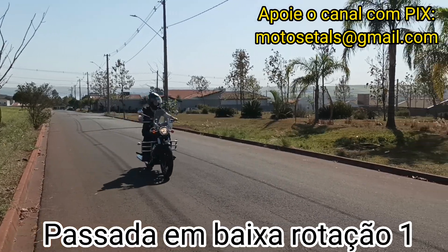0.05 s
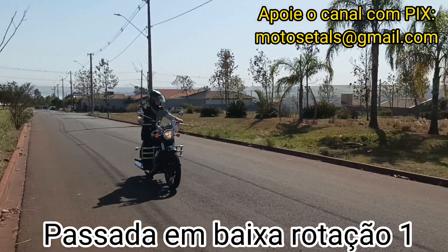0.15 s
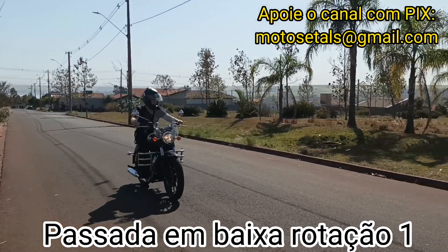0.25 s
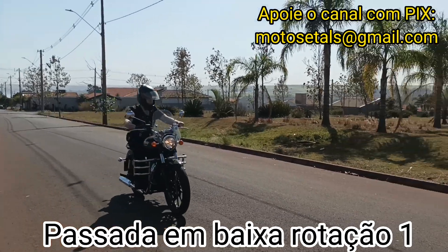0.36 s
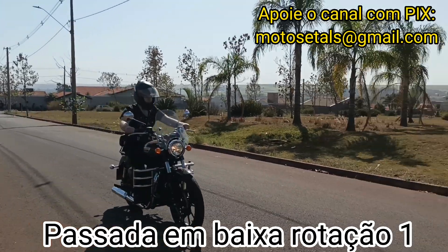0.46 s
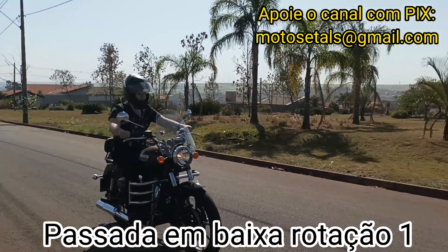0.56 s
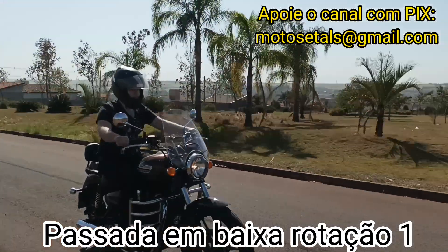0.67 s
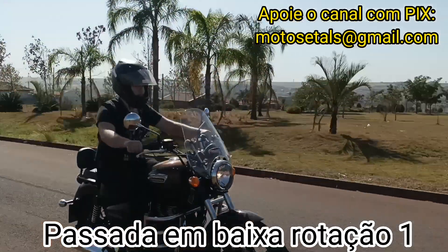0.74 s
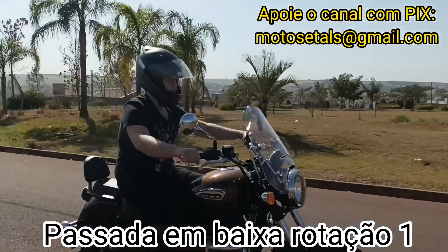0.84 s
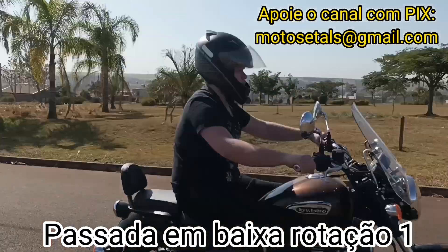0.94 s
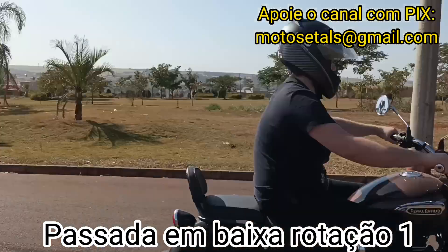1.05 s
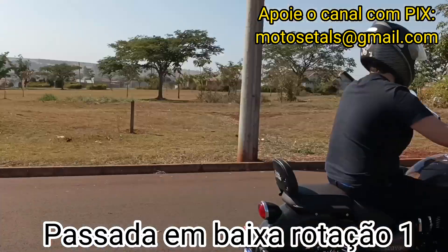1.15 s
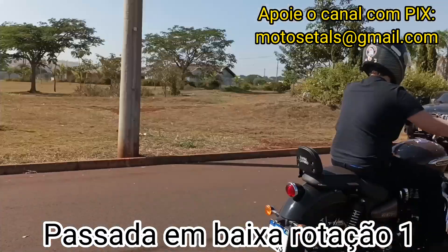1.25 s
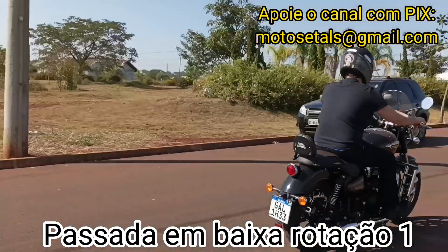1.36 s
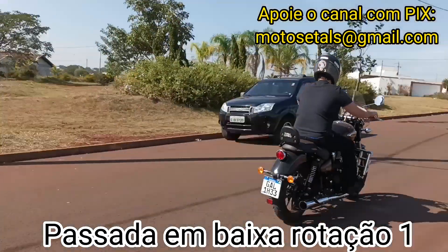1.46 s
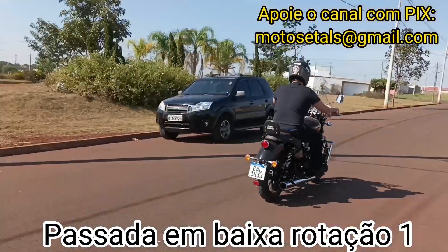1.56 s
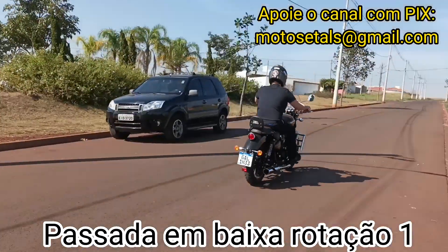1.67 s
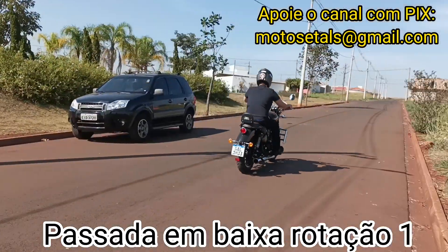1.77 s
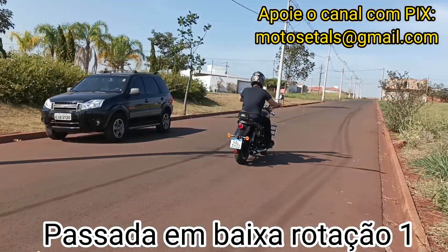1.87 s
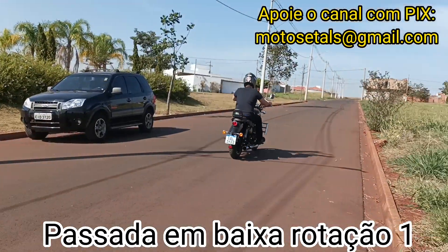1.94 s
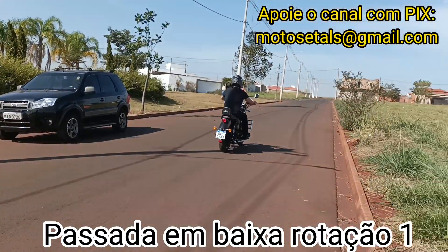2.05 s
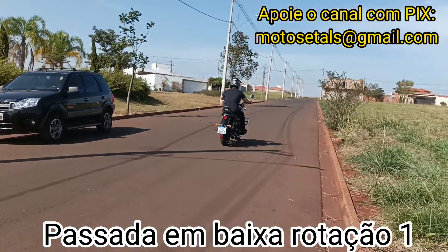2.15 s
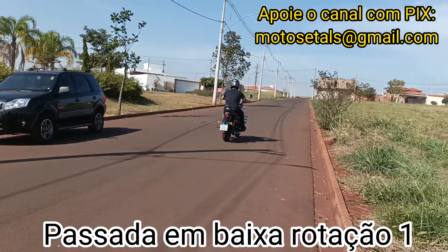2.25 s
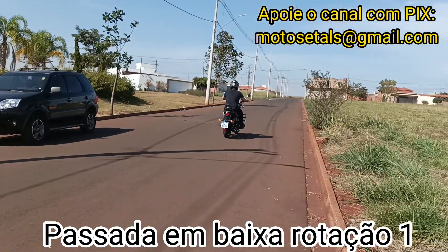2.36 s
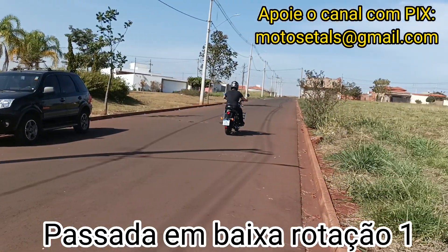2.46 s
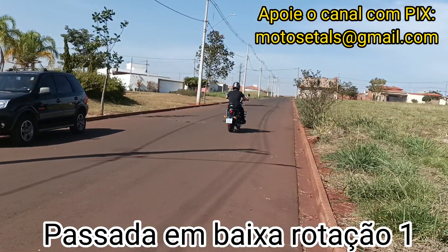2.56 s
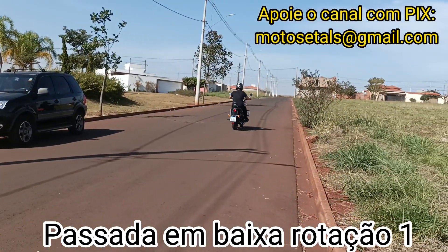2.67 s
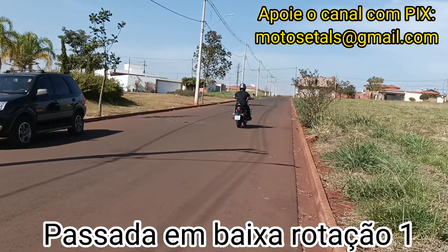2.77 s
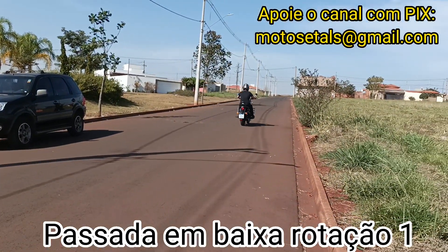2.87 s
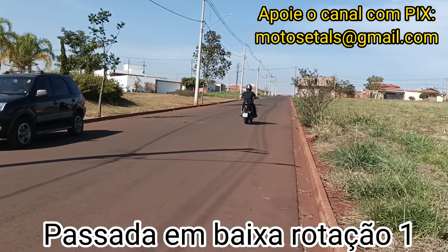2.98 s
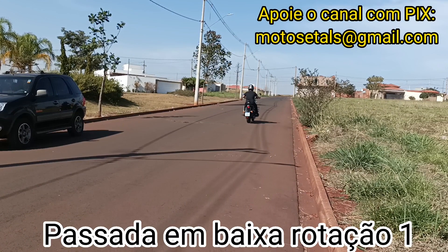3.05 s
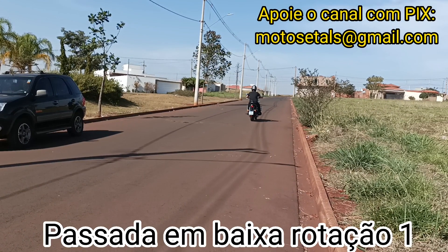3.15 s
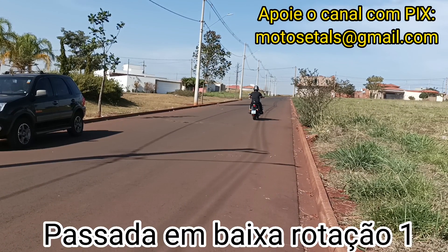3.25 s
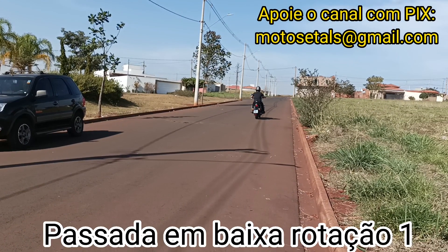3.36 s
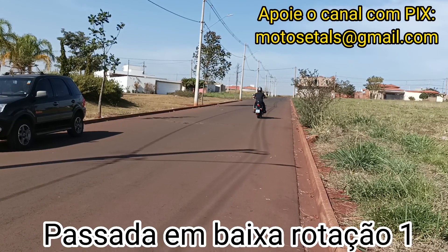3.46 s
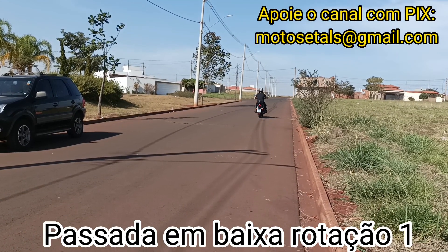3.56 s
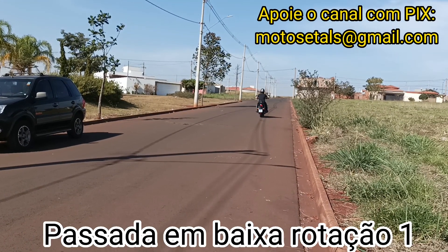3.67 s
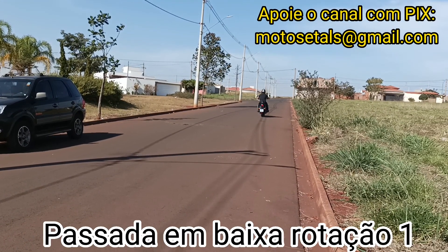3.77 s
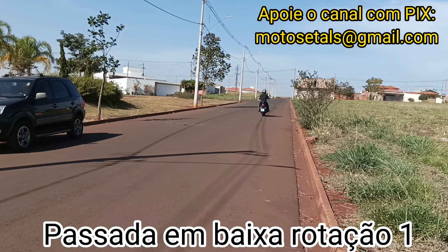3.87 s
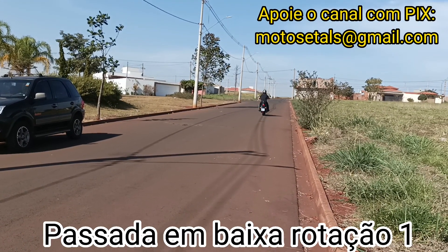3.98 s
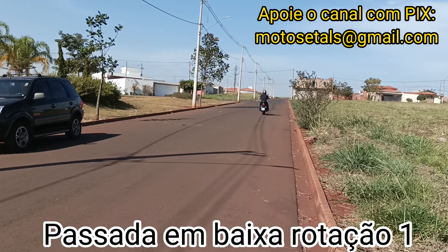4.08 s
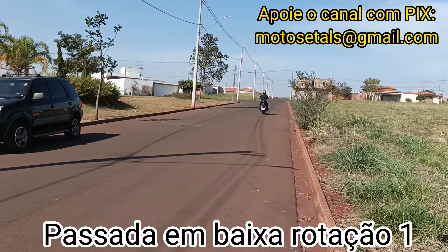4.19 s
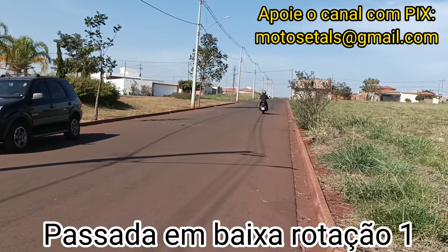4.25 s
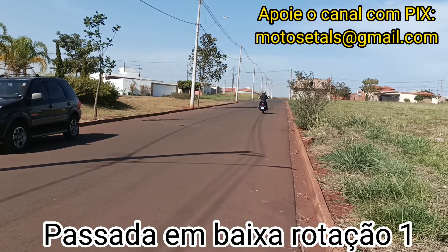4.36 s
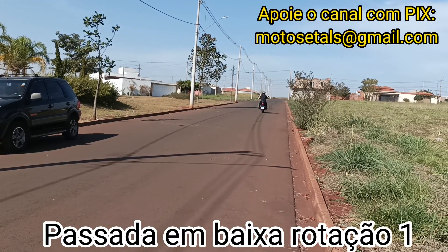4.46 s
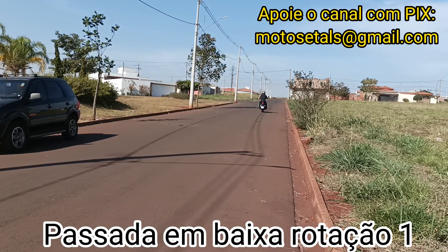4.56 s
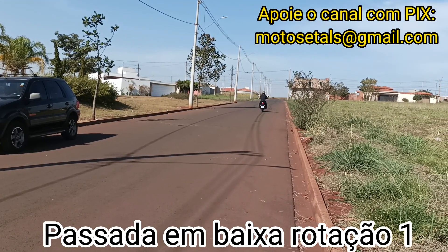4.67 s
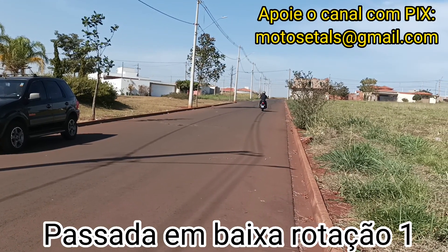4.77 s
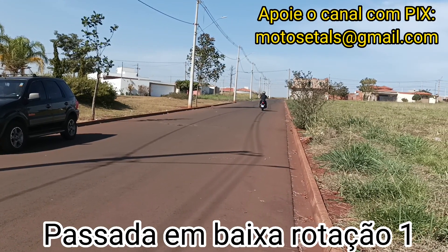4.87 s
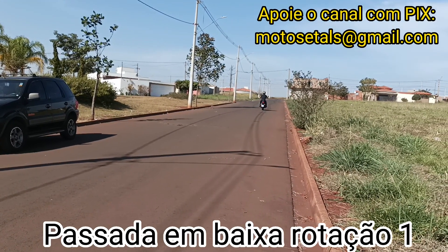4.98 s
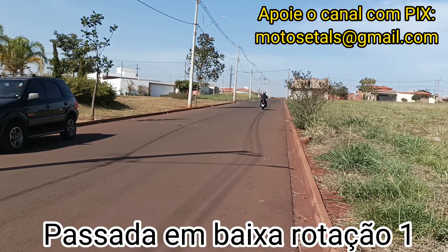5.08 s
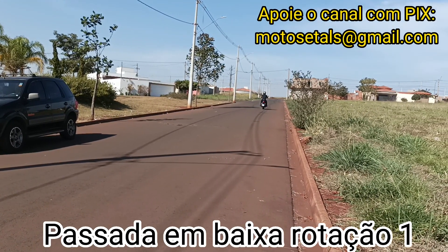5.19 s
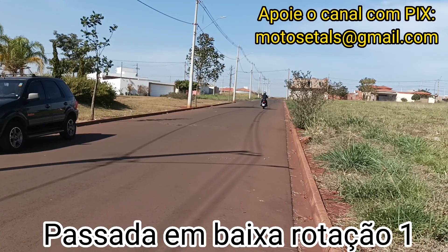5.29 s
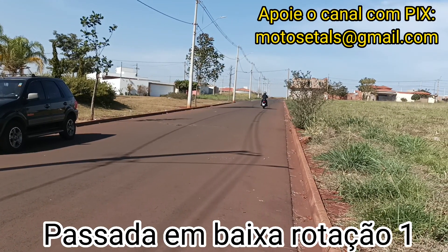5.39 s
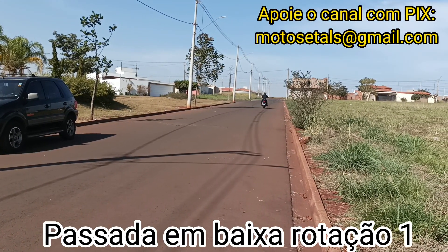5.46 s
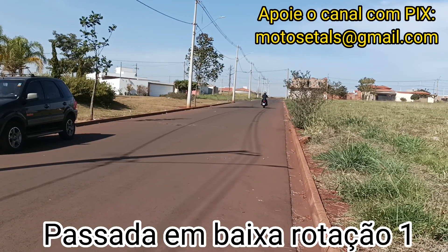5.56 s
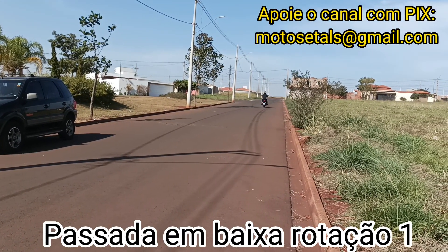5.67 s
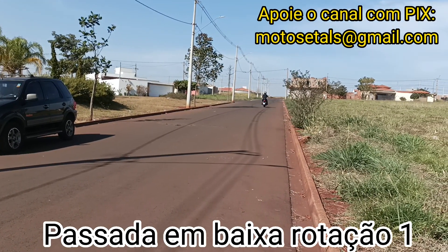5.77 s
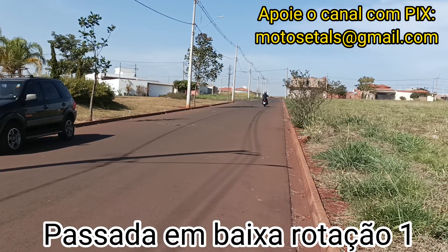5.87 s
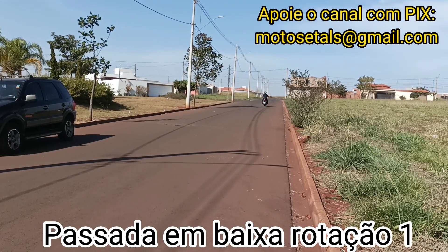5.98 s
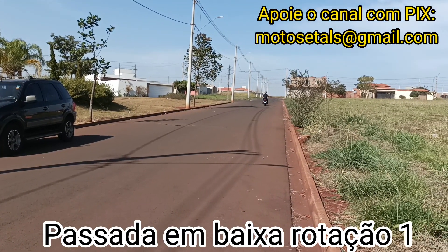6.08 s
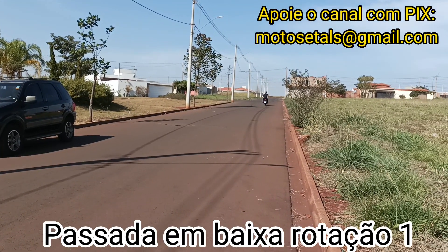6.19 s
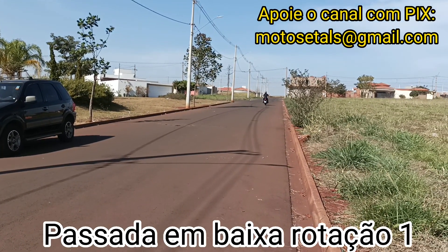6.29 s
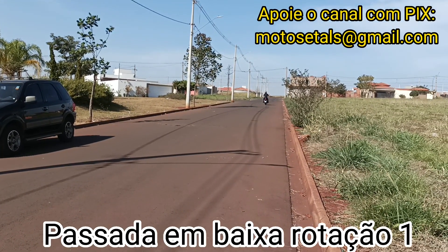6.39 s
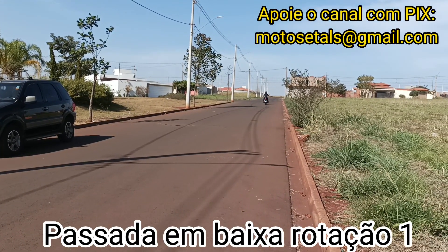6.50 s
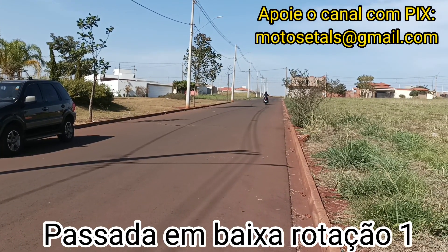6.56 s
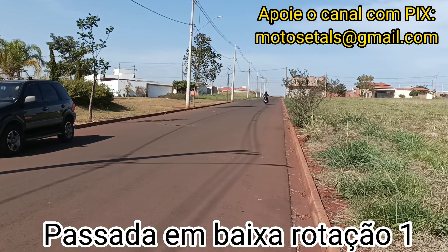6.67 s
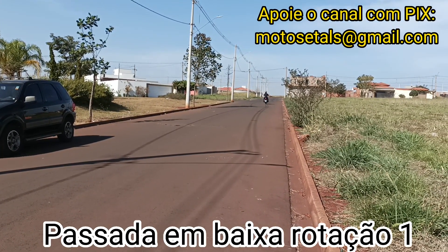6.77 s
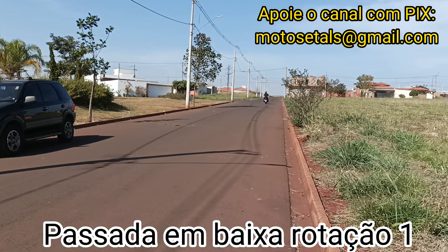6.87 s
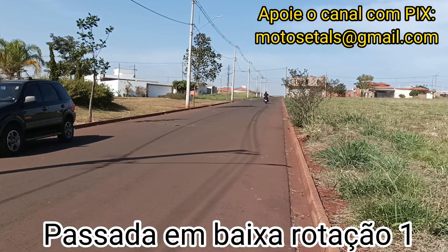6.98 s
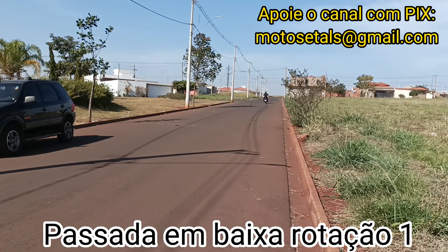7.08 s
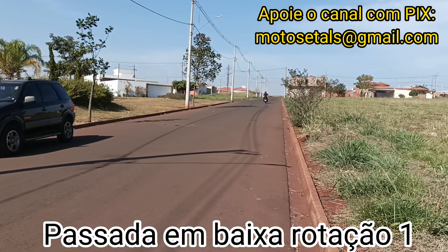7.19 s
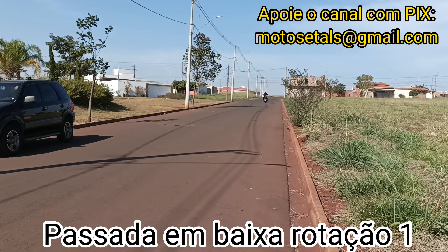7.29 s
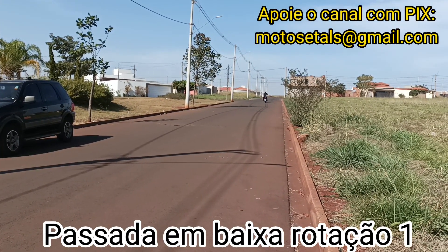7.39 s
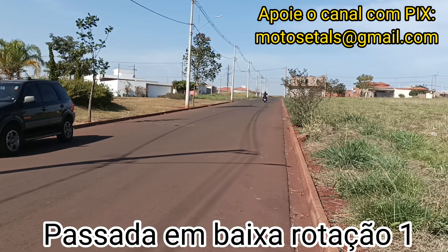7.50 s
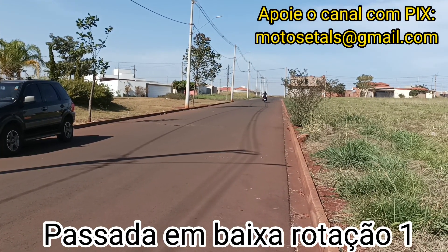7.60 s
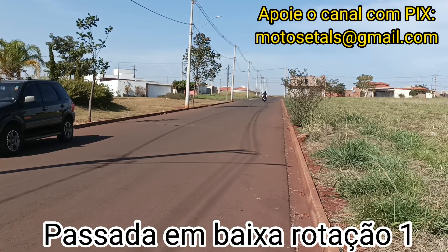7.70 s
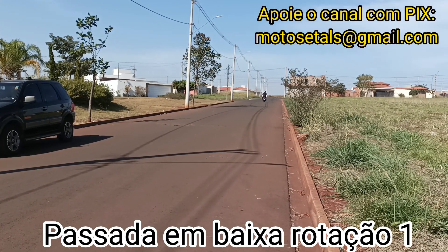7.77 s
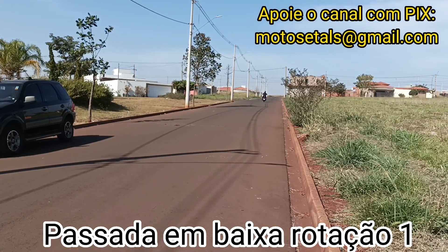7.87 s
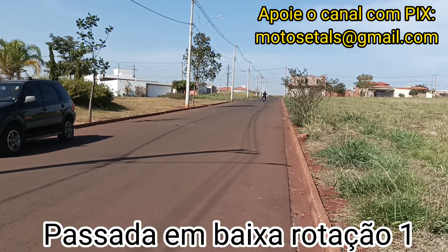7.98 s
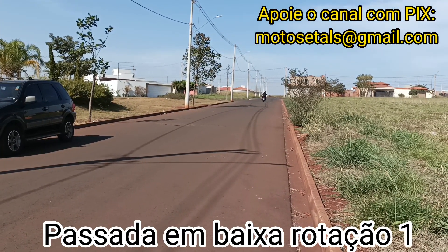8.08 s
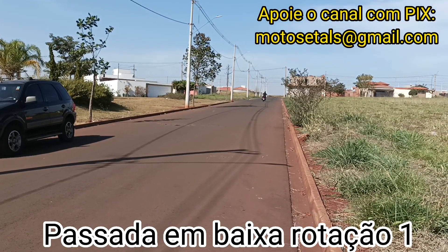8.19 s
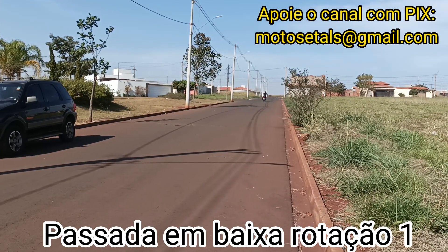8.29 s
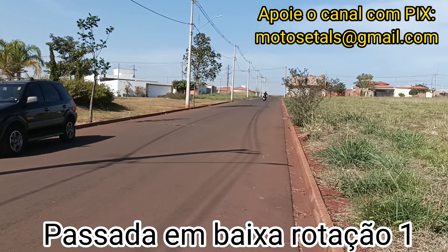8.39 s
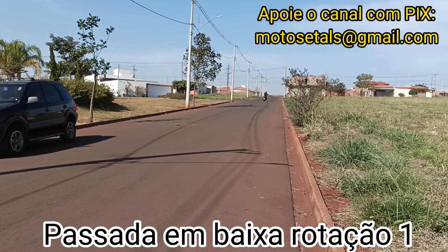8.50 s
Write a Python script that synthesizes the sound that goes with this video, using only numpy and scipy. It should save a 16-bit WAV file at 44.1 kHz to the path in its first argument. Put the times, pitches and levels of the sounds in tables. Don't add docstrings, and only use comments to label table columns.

```python
import sys
import numpy as np
from scipy import signal
from scipy.io import wavfile
from scipy.ndimage import uniform_filter1d

SR = 44100
rng = np.random.default_rng(int(sys.argv[2]) if len(sys.argv) > 2 else 0)


def voltage_ratio(level):
    return 10 ** (np.asarray(level, float) / 20)


def int16_out(signal):
    q = np.round(np.clip(np.atleast_2d(signal).T, -1, 1) * 32767)
    wavfile.write(sys.argv[1], SR, q.astype(np.int16))


N = 376613
T = np.arange(N) / SR
BANDS = 560 * 2 ** np.arange(0, 4.9, 1 / 3)
PASSES_S, FIRST_COAST_S = 1.027, 6.3148


def at_rms(x, db):
    return x * voltage_ratio(db) / np.sqrt(np.mean(x ** 2))


def cut(x, hz, kind, order=2):
    return signal.sosfilt(signal.butter(order, hz, kind, fs=SR, output="sos"), x)


def ring(x, hz, width, count=1):
    for _ in range(count):
        x = signal.lfilter(*signal.iirpeak(hz, hz / width, SR), x)
    return x


def late(x, ms):
    return np.interp(T - ms / 1000, T, x, left=0)


def at(table, hz):
    table_hz, value = np.transpose(table)
    return np.interp(np.log(hz), np.log(table_hz), value)


def blend(hz, colour, anchors, curves):
    db = at(colour, hz)
    for anchor, curve, row in zip(anchors, curves, np.eye(len(anchors))):
        share = np.interp(np.log(hz), np.log(anchors), row)
        db = db + share * (curve - at(colour, anchor))
    return db


def walk(rate):
    hold = int(SR / rate)
    steps = np.repeat(rng.standard_normal(N // hold + 1), hold)
    return 1.25 * uniform_filter1d(uniform_filter1d(steps, hold), hold)[:N]


def train(times, gains, shape):
    x = np.zeros(N)
    i = np.round(times * SR).astype(int)
    x[i[i < N]] = gains[i < N]
    return signal.oaconvolve(x, shape)[:N]


def slug(ms):
    return np.exp(-.5 * ((T[:400] * 1000 - 4) / ms) ** 2)


# hz, likeness (0-1)
LIKENESS = [(60, 0.97), (130, 0.98), (290, 0.1), (640, 1), (1410, 0.6), (3100, 0.5), (6820, 0.2),
            (15000, -0.01)]
# hz, left_minus_right_db
LEFT_LEAN = [(60, 0.5), (110, 0.5), (200, 0.5), (380, 28.5), (700, 2), (1290, 1), (2380, -0.5), (4400, -1),
             (8120, -14), (15000, 64)]


def wide(hz, gate, click=0):
    alike = np.clip(at(LIKENESS, hz) + 0.072, 0, 1)
    noise = gate * rng.standard_normal((2, N))
    noise[0] += click
    mid, side = cut(noise, [hz / 1.12, hz * 1.12], "band")
    pair = np.sqrt(1 + alike) * mid + np.sqrt(1 - alike) * side * np.array([[1], [-1]])
    return pair * voltage_ratio(np.clip(at(LEFT_LEAN, hz), -6, 9) * np.array([[.5], [-.5]]))


def air():
    far = rng.standard_normal(N) + 0.29 * rng.standard_normal((2, N))
    rumble = at_rms(cut(far, [70, 430], "band"), -45)
    gusts = rng.standard_normal(N) + 2.6 * rng.standard_normal((2, N))
    wind = cut(gusts, [25, 65], "band") * voltage_ratio(5.2 * walk(3))
    return rumble + at_rms(wind, -60)


# start_s, length_s, start_hz, end_hz, level_db
BIRD_CHIPS = [
    (2.836, 0.027, 8400, 8100, -55),
    (4.85, 0.018, 8100, 7740, -61),
    (6.062, 0.022, 8300, 7700, -48),
    (6.7, 0.016, 8800, 8200, -64),
    (7.431, 0.013, 8260, 7160, -55),
    (7.62, .11, 6850, 6700, -73),
    (7.673, 0.084, 7060, 3900, -65),
]


def birds():
    out = np.zeros(N)
    for s, length, hz, end_hz, db in BIRD_CHIPS:
        u = np.clip((T - s) / length, 0, 1)
        cycles = length * (hz * u + (end_hz - hz) * u ** 2 / 2)
        out += voltage_ratio(db) * np.sin(np.pi * u) * np.sin(2 * np.pi * cycles)
    return out * np.array([[.8], [1.2]])


def closeness(t):
    near_s = 0.52
    return 1 / (1 + ((t - PASSES_S) / near_s) ** 2)


def effort(t):
    return np.exp(-((t - 5.06) / 1.38) ** 2)


# far_db, swell_db at the pass, fade_db_per_s after it, effort_db, throttle_shut_db
ROLL_LEVELS = [
    (-46.5, 4.5, -0.39, 2.5, -2.5),
    (-53, 11.5, 0.05, 3, -1.5),
    (-56.5, 9.5, -0.93, 2, -0.5),
    (-60, 11.5, -1.11, 1, -7),
]


def rolling(t):
    shut = np.interp(t, [FIRST_COAST_S - .1, FIRST_COAST_S + 0.36], [0, 1])
    away_s = np.maximum(t - PASSES_S, 0)
    return [db + swell * closeness(t) + fade * away_s + work * effort(t) + off * shut
            for db, swell, fade, work, off in ROLL_LEVELS]


# hz, level_db per Hz
HISS_COLOUR = [(500, -6), (829, -2), (1110, -4), (1240, -16), (1750, -15.5), (2150, -25), (3040, -21.5),
               (5750, -35.5), (7670, -24.5), (11700, -48.5), (14100, -71), (15800, -70)]
# start_s, pitch_hz, level_db
GEAR_WHINE = [(0, 1715, -48), (.33, 1670, -58), (.7, 1560, -72), (2.3, 1433, -64), (4, 1550, -62),
              (5.8, 1618, -63), (6.28, 1460, -58), (6.36, 1682, -60), (7.4, 1474, -59), (8, 1330, -83)]


def roll():
    when = T[::2048]
    low, middle, upper, top = rolling(when)
    out = 0
    for hz in BANDS:
        db = blend(hz, HISS_COLOUR, [850, 1700, 3500, 7500], [low + 12, middle + 9, upper + 7, top + 6])
        out = out + wide(hz, voltage_ratio(np.interp(T, when, db) + 1.12 * walk(12)))
    s, hz, db = np.transpose(GEAR_WHINE)
    pitch_hz = np.interp(T, s, hz) + 4 * walk(16)
    gear = voltage_ratio(np.interp(T, s, db, left=-99, right=-99)) * np.sin(2 * np.pi * np.cumsum(pitch_hz) / SR)
    knock = rng.standard_normal(N) * voltage_ratio(np.interp(T, when, low))
    case = voltage_ratio(12 + 13.7 * effort(T)) * ring(knock, 613, 40) + voltage_ratio(18.5) * ring(knock, 732, 60)
    case += voltage_ratio(-1 + 20 * closeness(T + 0.074)) * ring(knock, 1500, 270)
    fins = voltage_ratio(np.interp(T, when, top) + 8) * ring(rng.standard_normal((2, N)), 6970, 1000, count=2)
    return out + gear + case + fins


# start_s, left_ms, right_ms, share
NEAR_ECHOES = [
    [(0, 0.54, 0.45, 0.46), (1, 0.58, 0.43, 0.18), (1.35, 0.87, .95, 0.13), (1.7, 1.28, 1.66, 0.21),
     (3, 1.54, 1.37, 0.18), (8.54, 1.34, 1.32, 0.39)],
    [(0, 1.35, 2.08, 0.36), (1.7, 1.66, 1.59, 0.31), (3, 1.77, 1.74, 0.19), (8.54, 1.75, 1.72, 0.36)],
    [(0, 0.14, 0.14, 0.1), (1.2, 0.21, 0.17, 0.1), (1.7, 0.22, 0.28, 0.29), (3, 0.23, 0.383, 0.12),
     (8.54, 0.22, 0.31, 0.39)],
]


def near(x):
    out, bright = x.copy(), cut(x, 1250, "high")
    for table in NEAR_ECHOES:
        s, left, right, share = np.transpose(table)
        for k, ms in enumerate((left, right)):
            out[k] += np.interp(T, s, share) * late(bright[k], np.interp(T, s, ms))
    return out


# pitch_hz, width_hz, depth (0-1)
BODY_DIPS = [
    (948, 54, 0.55),
    (1217, 97, 0.56),
]


def road(x):
    close = np.interp(T, (.4, .7, 2.3, 3.1), [0, 1, 1, 0])
    far_notch = (.88 - 0.68 * close) * ring(x, 506, 108)
    x = x - far_notch - 0.42 * close * ring(x, 623, 90)
    for hz, width, depth in BODY_DIPS:
        x = x - depth * ring(x, hz, width)
    before, after, right = np.array((0, 7, 5)) * 1000 / SR
    return np.array([late(x[0], np.interp(T, (.85, 1.1), [before, after])), late(x[1], right)])


# hz, level_db per Hz
CRACK_COLOUR = [(500, -5), (1040, 5.5), (1330, -10), (1840, -10), (2250, -22), (2910, -17.5), (4450, -29.5),
                (5750, -45), (7450, -39.5), (11800, -43), (15800, -55)]
# start_s, peak_db, treble_db over the peak
HARD_FIRINGS = [(0.388, -16, -48), (0.434, -20, -27), (1.089, -16, -22), (1.184, -11, -33),
                (1.328, -15.5, -18), (1.618, -19.5, -16.5), (2.198, -15, -25), (2.391, -17, -29),
                (2.439, -18, -17.5), (2.487, -17.5, -29), (2.679, -13.5, -26.5), (2.966, -15.5, -31),
                (3.156, -18, -25), (3.441, -19, -24), (3.629, -13, -31), (3.677, -18, -30),
                (3.723, -16.5, -29), (3.771, -15, -40), (3.865, -14.5, -32), (3.912, -16.5, -32),
                (3.959, -15, -25), (4.1, -12.5, -27), (4.287, -14, -32), (4.334, -16.5, -27),
                (4.427, -12.5, -29), (6.964, -18.5, -31), (7.389, -19.5, -30), (7.896, -19, -23)]
# start_s, level_db
DEEP_THUDS = [
    (2.440, -12),
    (2.680, -11.5),
    (3.960, -12.5),
    (4.660, -32),
    (4.940, -17),
]


def cracks(times, low_db, mid_db, high_db, off):
    chance = rng.standard_normal((len(times), len(BANDS) + 2))
    low = low_db + 0.81 * chance[:, 0]
    mid = mid_db + 2.1 * chance[:, 1]
    high = high_db + 4.0 * chance[:, 1]
    for s, db, treble_db in HARD_FIRINGS:
        k = np.argmin(abs(times - s))
        low[k], mid[k], high[k] = db - 12.0, db + treble_db - 7.5, db + treble_db - 16.5
    tail = voltage_ratio(-49) * np.exp(-T[1:1500] / .007)
    shape = np.convolve(slug(1.61), np.r_[1, tail])
    sign = np.where(times < off[0] - .02, -1, .6)
    beam_db = 6 * np.exp(-((times - 1.89) / 0.26) ** 2)
    out = 0
    for k, hz in enumerate(BANDS):
        db = blend(hz, CRACK_COLOUR, [1000, 3200, 7500], [low + 14, mid + 14, high + 8])
        db += 0.96 * chance[:, k + 2] + beam_db * (hz > 4000)
        air_loss_db = 4 * np.clip(times - 5.0, 0, 9) * (hz / 10000) ** 2
        gain = voltage_ratio(db - air_loss_db)
        start = times - 1.636 / hz
        click = train(start + 0.000994, sign * gain, np.ones(1)) * (2.2 + 11 * (hz < 2000))
        out = out + wide(hz, train(start - .0028, gain, shape), click)
    snap = -train(times - .003, (sign < 0) * voltage_ratio(1.22 * low + 22), slug(0.22))
    s, db = np.transpose(DEEP_THUDS)
    snap = cut(snap, 63, "high") - train(s - .004, voltage_ratio(db), slug(0.43))
    tick_db = -35 + 3 * chance[:len(off), 0] - 6.0 * (off - 9.0)
    tick = ring(train(off - .024, voltage_ratio(tick_db), slug(.2)), 820, 120)
    return out + tick, cut(snap, 28, "high")


def pipe(x, echo, ms, dull):
    out = back = x
    for _ in range(3):
        back = signal.lfilter([1 - dull], [1, -dull], echo * late(back, ms))
        out = out + back
    return out


# start_s, echo_share, upper_mode_share, lower_mode_share
PIPE_VIEW = [
    (0, 0.17, 5.5, 1.1),
    (.7, 0.11, 12.6, 1.3),
    (1.2, 0.049, 0.65, 1.9),
    (1.7, 0.019, 0.56, 1.6),
    (3, 0.013, 2.1, 6.7),
    (5.8, 0.011, 5.6, 2.2),
    (6.2, 0.4, 2.2, 1.5),
]


def pulling_thump(on, s, db, boom_db):
    firing_db = np.interp(on, s, db) + .5 * rng.standard_normal(len(on))
    push = train(on - .0051, voltage_ratio(firing_db), slug(.82))
    when, *shares = np.transpose(PIPE_VIEW)
    bright, upper, lower = (np.interp(T, when, c) for c in shares)
    x = ring(push, 327.5, 912, count=3)
    x = pipe(x, 0.7, 9.62, .99) + bright * late(x, 11.08)
    boom = 5 * voltage_ratio(np.interp(T, s, boom_db)) * ring(x, 84, 28)
    return 11 * x + boom + upper * ring(x, 443, 90) + lower * ring(x, 420, 58)


def coasting_thump(off, s, db, boom_db):
    firing_db = np.interp(off, s, db) + .6 * rng.standard_normal(len(off))
    push = train(off - .0116, voltage_ratio(firing_db), slug(.55))
    y = push - 1.23 * late(push, 5.57)
    valve = ring(late(push, 6.27), 388, 120, count=2)
    cooling = np.clip((8.3 - T) / 3.26, 0, 1)
    y = ring(y, 66, 66)
    y = coasting_modes(y, push, cooling, valve)
    y = pipe(y, -0.8, 9.7, 0.99) - 0.1 * late(y, 19.4)
    y = 20 * y + 5 * voltage_ratio(np.interp(T, s, boom_db)) * ring(y, 71, 37)
    return cut(y, 50, "high")


def coasting_modes(slow, push, cooling, valve):
    y = push - 1.23 * late(push, 5.57)
    upper = 0.21 * cooling * ring(late(y, 3.96), 246, 150)
    return slow + upper + 0.082 * ring(late(y, 3.55), 226, 71) + 0.41 * valve


def firings(rate, first, last):
    t = np.arange(first, last, 1e-4)
    turns = np.cumsum(np.interp(t, *np.transpose(rate))) * 1e-4
    return np.interp(np.arange(int(turns[-1]) + 1), turns - turns[0], t)


# start_s, firings_per_s
PULL_FIRINGS = [(0, 21.311), (.35, 21.434), (.85, 21.422), (1.5, 20.608), (1.9, 20.664), (4.75, 21.523),
                (5.65, 21.539), (6.05, 21.157), (6.25, 20.445)]
# start_s, firings_per_s
COAST_FIRINGS = [(6.3, 20.609), (7, 19.173), (8, 17.006), (8.6, 15.855)]
# start_s, thump_db, crack_db over the thump, crack_sharpness (about 0-1)
EXHAUST_LEVELS = [
    [(0, -20.5, -13.5, 0.15), (.5, -19, -17, 0.3), (.95, -15.5, -15, 0.54), (1.19, -13.5, -10.5, 0.8), (1.5, -17, -21.5, 0.78), (1.95, -18.5, -16.5, 0.81), (2.4, -20.3, -14.5, 0.42), (3.2, -22, -12, 0.52), (4, -24, -9.5, 0.6), (4.3, -24.5, -4.5, 0.99), (5, -25, -11.5, 1.1), (5.6, -26.5, -13, 0.78), (5.92, -32, -14, .5), (6.2, -43, -14, -.5)],
    [ (6.31, -34, 2, 0.36), (7.3, -36.5, 3.5, .4), (7.9, -40.3, 5, 0.99), (8.5, -42.5, 5.5, 0.99)],
]
# dull_db, gain_db when sharp
CRACK_EDGE = [
    [(-41.5, 19), (-46.5, 10)],
    [(-30, 24.5), (-39, 19)],
]


def motorcycle():
    on = firings(PULL_FIRINGS, .0152, 6.27)
    off = firings(COAST_FIRINGS, FIRST_COAST_S, N / SR)
    pull, coast = (np.transpose(c) for c in EXHAUST_LEVELS)
    boom_db = np.interp(pull[0], [PASSES_S - .2, PASSES_S + .3], [-3, -1])
    boom_db = boom_db + np.interp(pull[0], (5.44, 6.37), [0, 28])
    coast_boom_db = np.interp(coast[0], [7.2, 8.2], (1, 12))
    thump = pulling_thump(on, *pull[:2], boom_db) + coasting_thump(off, *coast[:2], coast_boom_db)
    body = cut(thump, 82, "high", order=4)
    levels = []
    for when, (s, db, crack, sharp), edge in zip((on, off), (pull, coast), CRACK_EDGE):
        overs = [crack] + [dull + gain * sharp for dull, gain in edge]
        levels.append([np.interp(when, s, db + over) for over in overs])
    crack, snap = cracks(np.r_[on - .0015, off - .0036], *np.hstack(levels), off)
    side = voltage_ratio(-30.5) * late(body, 0.76) * np.array([[1], [-1]])
    return body + side + snap + near(crack + roll())


def scene():
    return road(motorcycle() + air()) + birds()


def top_cut(x):
    return signal.sosfilt(signal.butter(12, 16170, fs=SR, output="sos"), x)


def record(dry):
    rounded = np.tanh(0.79 * dry) / 0.8
    mix = cut(rounded, 14800, "low", order=8)
    return top_cut(mix)


dry = scene()
out = record(dry)
int16_out(out)
```